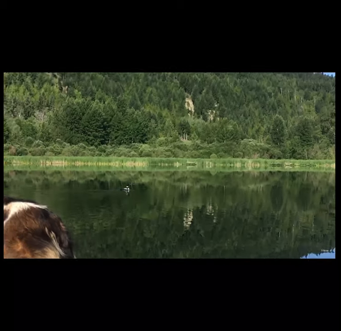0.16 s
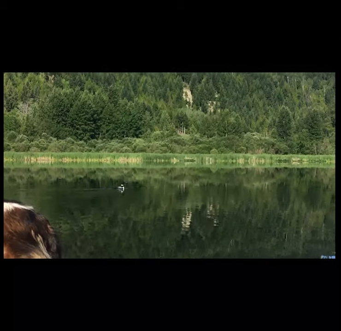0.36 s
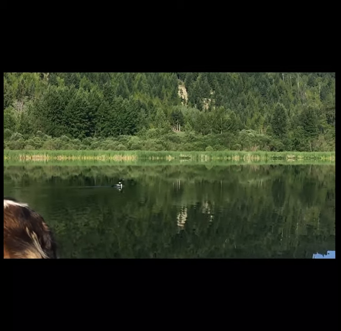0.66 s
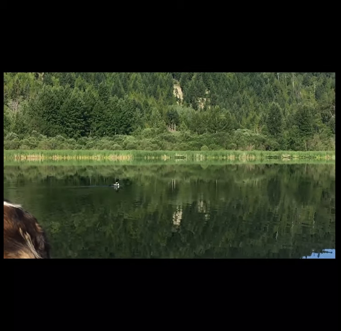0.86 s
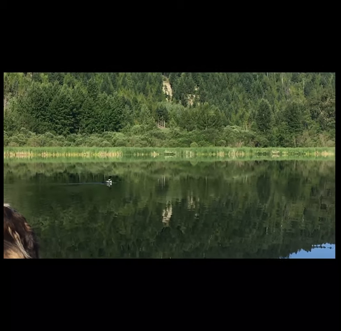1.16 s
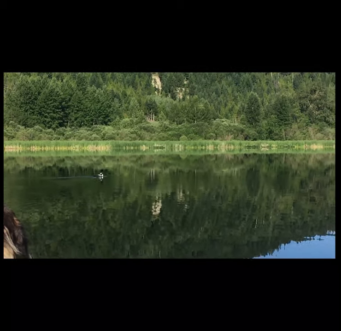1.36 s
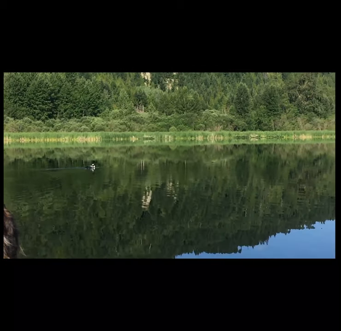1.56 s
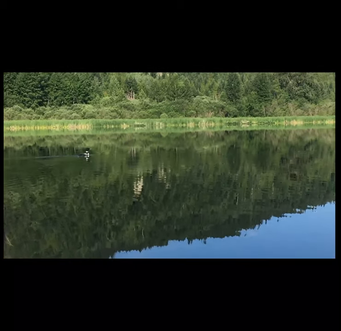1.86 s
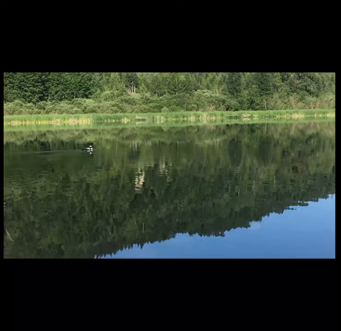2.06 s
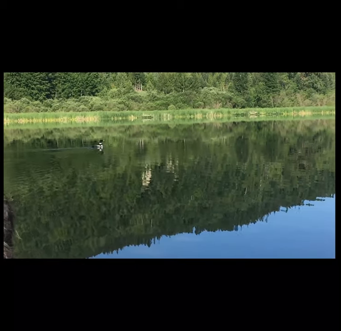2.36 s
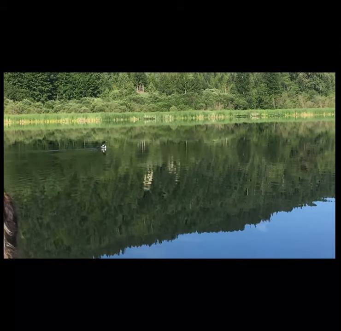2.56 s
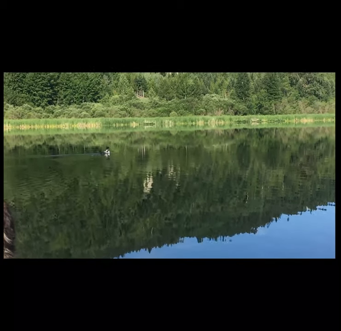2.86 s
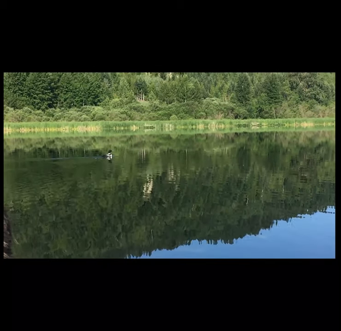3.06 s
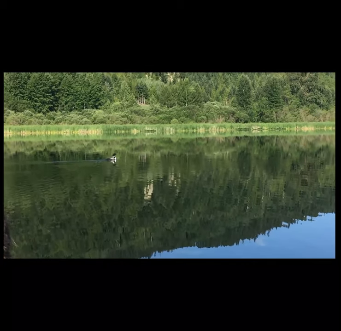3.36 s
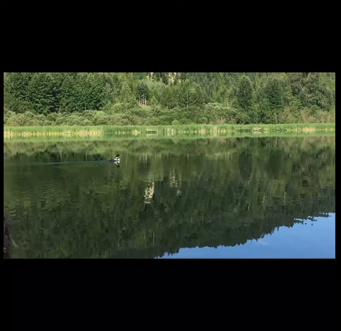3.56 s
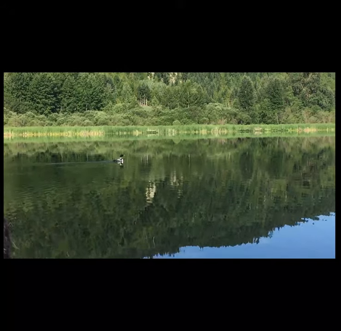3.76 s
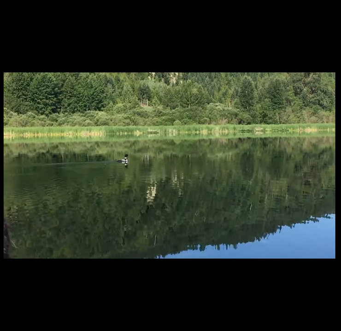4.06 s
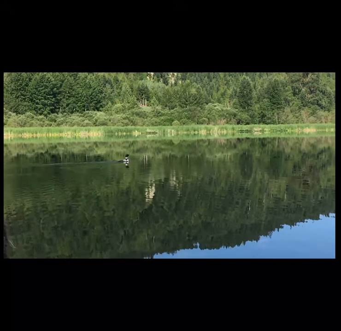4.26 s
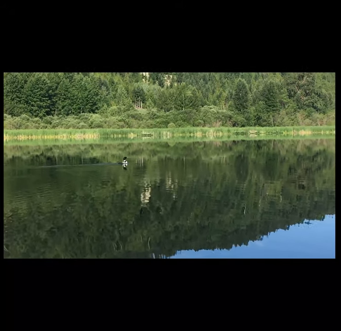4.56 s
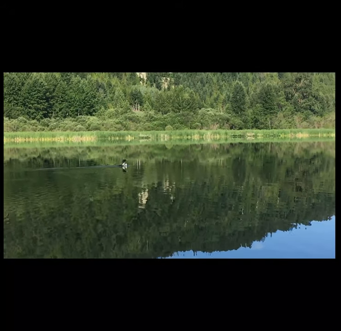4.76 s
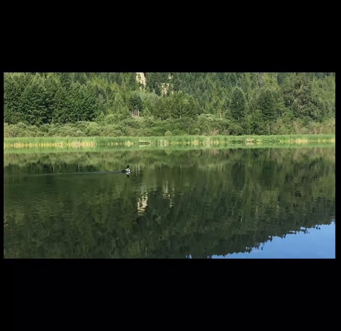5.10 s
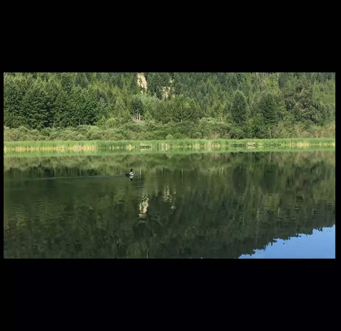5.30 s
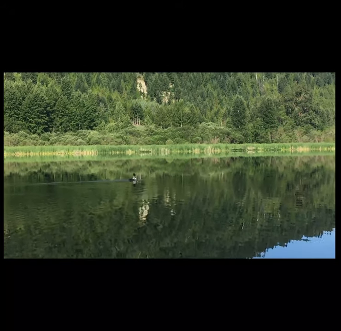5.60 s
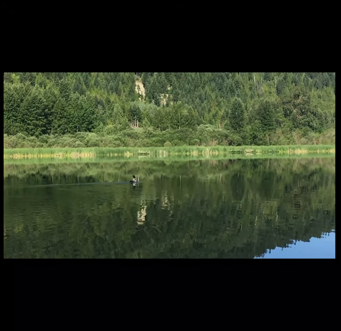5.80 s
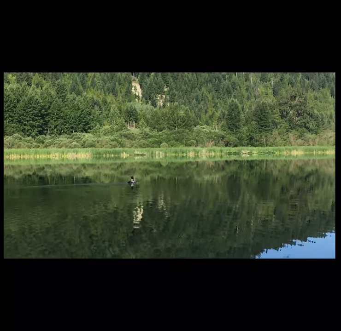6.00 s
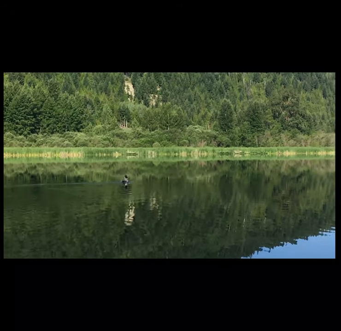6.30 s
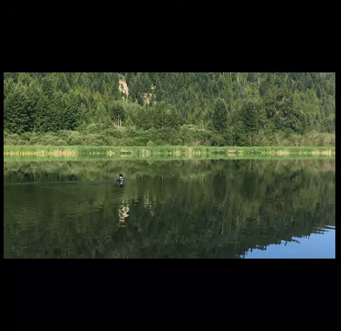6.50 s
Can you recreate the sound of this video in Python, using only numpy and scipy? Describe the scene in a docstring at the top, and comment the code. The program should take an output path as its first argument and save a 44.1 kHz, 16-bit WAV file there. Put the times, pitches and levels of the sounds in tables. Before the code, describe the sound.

On a calm forested lake, a fairly near loon gives quick wavering tremolo calls, each rising from a low voice into a clear high one, about every two seconds. Two farther loons answer faintly in between. The first half second has rough rubbing, snaps and soft knocks right at the microphone; then quiet air, occasional ticks and thin songbird chirps, with a soft hillside echo.

```python
"""A calm, wooded lake under still air: three loons trade tremolo calls, one near and two further out.
Each full call wavers about ten times a second as effort builds and tires: low, then a purer high register,
then at times low again, ending in a sigh. Harmonics pass through throat colours; a faint wash returns from the hillside.
Shaped noise rustles by the microphone at first, with damped knocks, dry snaps, faint ticks and scratches;
distant songbirds are thin gliding sines, and the air is coloured noise."""
import sys
import numpy as np
from scipy import signal
from scipy.fft import rfft, irfft
from scipy.io import wavfile
from scipy.ndimage import map_coordinates

SR = 44100
rng = np.random.default_rng(int(sys.argv[2]) if len(sys.argv) > 2 else 0)


def log_audio(samples):
    """Write samples as a 16-bit WAV file to the path given in sys.argv[1]."""
    # one column per channel
    frames = np.atleast_2d(samples).T
    # limit to full scale, then quantise
    limited = np.clip(frames, -1, 1)
    pcm = np.round(limited * 32767).astype(np.int16)
    wavfile.write(sys.argv[1], SR, pcm)


N = 292824
TIME = np.arange(N) / SR


def undb(db):
    """Decibels to gain."""
    return 10 ** (np.asarray(db) / 20)


def gain_at(hz, points):
    """Gain of a (hz, db) spectrum, read on a log-frequency axis."""
    at, db = np.transpose(points)
    return undb(np.interp(np.log(hz + 1), np.log(at), db))


def noise(points, size=N):
    """Noise of rms 1 with the given colour, rolled off below its first point."""
    hz = np.arange(size // 2 + 1) * SR / size
    below = np.minimum(hz / points[0][0], 1) ** 2
    white = rng.standard_normal(size)
    x = irfft(rfft(white) * gain_at(hz, points) * below, size)
    return x / x.std()


def walk(rate, size=N):
    """Smooth random curve of spread near 1, with rate new values a second."""
    place = np.arange(size) * rate / SR
    return map_coordinates(rng.standard_normal(size // 8 + 4), [place], order=3, mode="mirror")


def add(out, s, x):
    """Mix x into out from time s on."""
    i = max(int(s * SR), 0)
    out[i:i + len(x)] += x[:max(N - i, 0)]


# colour of the still air over the lake: pitch_hz, relative level_db
AIR_COLOUR = [(25, -14), (38, -8), (58, 2), (85, -1), (125, -10.5), (165, -2), (195, -8), (240, -4.5),
              (330, -18.5), (600, -22), (900, -21.5), (1150, -17.5), (1400, -26), (2200, -23.5),
              (2900, -31.5), (4400, -27.5), (5000, -34.5), (9500, -40), (10500, -44), (12000, -40.5),
              (15500, -47.5)]
AIR_DB = -59


def air(sway_db, low_db, low_sway_db, drift_db=0.5):
    """An outdoor hush of noise: smooth in the treble, swaying and slowly drifting in the bass."""
    hush = noise(AIR_COLOUR) * undb(AIR_DB)
    low = signal.sosfiltfilt(signal.butter(2, 400, fs=SR, output="sos"), hush)
    treble = (hush - low) * undb(sway_db * walk(3.81))
    bass = low * undb(low_db + low_sway_db * walk(8.3) + drift_db * walk(2))
    return treble + bass


# notes of distant songbirds, before random detuning and loudness:
# start_s, note_length_s, start_hz, end_hz, relative level_db, notes in the run
BIRD_NOTES = [(3.232, 0.018, 4300, 2830, -64.5, 12), (3.608, 0.065, 4620, 4500, -74, 1),
              (4.78, 0.027, 3300, 3600, -76, 1), (4.851, 0.034, 3300, 3556, -77, 1),
              (4.915, .055, 4700, 3080, -71, 1), (5.07, .025, 3200, 3460, -74, 1),
              (5.134, 0.0241, 4730, 3690, -71.5, 1), (5.463, .055, 4750, 3070, -70.5, 1),
              (5.62, .03, 3200, 3530, -67, 1), (5.678, 0.023, 4900, 3700, -71, 1),
              (5.846, .024, 4400, 2950, -64, 5), (5.995, .03, 4800, 3050, -68, 5)]
TRILL_PERIOD_S = .0268


def songbirds(level_db, scatter_db, uneven_db=2.2, settle_db=8):
    """Distant thin whistles: gliding sines, single or run together as a trill, smeared by the trees."""
    out = np.zeros(N)
    for s, length, start_hz, end_hz, db, count in BIRD_NOTES:
        size = int(length * SR)
        left = np.linspace(1, 0, size)
        for k in range(int(round(count))):
            detune, loud, late = rng.standard_normal(3)
            # each sweep slows towards its end; in a trill the weight lies on its last part
            hz = (end_hz + (start_hz - end_hz) * left ** 1.8) * (1 + .04 * detune)
            whistle = np.sin(2 * np.pi * np.cumsum(hz) / SR)
            run_swell = np.sin(np.pi * (k + 1) / (count + 1)) ** .5
            level = undb(db + uneven_db * loud - settle_db * left * (count > 1))
            note = run_swell * level * signal.windows.tukey(size, .4) * whistle
            add(out, s + k * TRILL_PERIOD_S + 0.0018 * late, note)
    trees = rng.standard_normal(SR // 2) * undb(-60 * TIME[:SR // 2] / 0.29)
    trees /= np.sqrt(np.sum(trees ** 2))
    smear = undb(scatter_db) * signal.fftconvolve(out, trees)[:N]
    return undb(level_db) * (out + smear)


# thin high scratches: start_s, level_db before the swell and grain
SCRATCHES = [(6.075, -72.5), (6.47, -83)]


def scratches(length_s=.05, grain_db=5):
    """Brief grainy rubs high in the treble: noise with a fast random level."""
    out, size = np.zeros(N), int(length_s * SR)
    for s, db in SCRATCHES:
        hiss = noise([(6000, -14), (10000, -8), (12000, -2), (16000, -17)], size)
        grains = hiss * undb(grain_db * walk(250, size))
        add(out, s, undb(db) * np.hanning(size) * grains)
    return out


# dry snaps within the rustle: start_s, relative level_db
SNAP_LEVELS = [(.009, -31), (.203, -28), (.468, -28)]
# faint sharp ticks: start_s, relative level_db
TICK_LEVELS = [(1.5634, -47), (2.5667, -44.5), (3.3773, -47), (4.5746, -44), (5.5778, -47.5),
               (6.5815, -43.5)]
# colour of a tick: pitch_hz, relative level_db
TICK_SPECTRUM = [(3000, -24), (4400, 5), (5500, -6), (7300, -3.5), (8500, -17.5), (10000, -15.5),
                 (13000, -45)]


def clicks(table, colour, t60_s):
    """Very short bursts of coloured noise, decaying 60 dB in t60_s."""
    out, t = np.zeros(N), TIME[:SR // 10]
    for s, db in table:
        add(out, s, undb(db - 60 * t / t60_s) * noise(colour, len(t)) / 2)
    return out


# soft knocks close by: start_s, level_db before the onset, pitch_hz, ring_t60_s
KNOCK_MODES = [(.016, -33.5, 522, 0.051), (0.142, -29, 48.7, 0.12), (.203, -29, 186, 0.038),
               (0.53, -41, 430, 0.058), (.559, -22, 60.8, 0.066), (0.557, -27, 266, 0.024),
               (0.709, -39, 255, 0.024), (0.932, -41, 466, .035), (0.932, -35, 240, 0.023),
               (1.099, -47.5, 330, .04), (1.176, -42.5, 130.3, 0.062), (1.178, -45, 525, 0.051),
               (1.682, -43, 510, 0.06), (2.179, -48.5, 478, 0.095), (2.265, -49, 327, .1),
               (2.291, -46.5, 497, 0.082)]


def knocks(contact_s=0.00074, dull_db=-11):
    """Each soft blow rings one damped low mode with a little dull noise."""
    out, t = np.zeros(N), TIME[:SR // 4]
    for s, db, hz, t60 in KNOCK_MODES:
        thud = noise([(80, 20.5), (500, -9.5), (900, -37), (3000, -40.5), (8000, -43)], len(t))
        ring = np.sin(2 * np.pi * hz * t) + undb(dull_db) * thud
        onset = 1 - np.exp(-t / contact_s)
        add(out, s, undb(db - 60 * t / t60) * onset * ring)
    return out


# rubs by the microphone: start_s, length_s, relative rubbing level_db, relative hiss level_db
RUBS = [(0, .045, -53, -75), (.045, .075, -48.5, -72.5), (.12, .07, -58, -83), (.188, .062, -42, -73),
        (.25, .075, -45, -67.5), (.33, .075, -51, -79), (.41, .085, -49.5, -67), (.51, .055, -51, -73)]
# colours of the rubbing, the hiss and the handling rumble: pitch_hz, relative level_db
RUB_SPECTRUM = [(120, 0.5), (220, -0.5), (500, -3.5), (800, -11.5), (1300, -9.5), (2100, -9), (2750, -24),
                (3300, -16.5), (4300, -14.5), (6000, -47), (11000, -51.5)]
HISS_SPECTRUM = [(1000, -23.5), (2800, -13), (4300, 4), (5600, 3.5), (7500, -6.5), (9500, -7),
                 (10400, -21.5), (12500, -19), (16000, -31.5)]
RUMBLE_SPECTRUM = [(18, -15.5), (35, 10), (60, 22.5), (120, 10.5), (200, -20), (350, -53)]
RUB_ATTACK_S, RUB_RELEASE_S = .02, .012
RUMBLE_END_S, RUMBLE_RELEASE_S = .59, .014


def rustle(rub_db, hiss_db, rumble_db, grain_db):
    """Uneven rubbing noise close to the microphone, with a handling rumble under it."""
    rub, hiss = np.zeros(N), np.zeros(N)
    for s, length, stroke_db, stroke_hiss_db in RUBS:
        attack = np.clip((TIME - s) / RUB_ATTACK_S, 0, 1)
        stroke = attack * np.exp(-np.maximum(TIME - s - length, 0) / RUB_RELEASE_S)
        rub = np.hypot(rub, undb(stroke_db) * stroke)
        hiss = np.hypot(hiss, undb(stroke_hiss_db) * stroke)
    rumble = np.exp(-np.maximum(TIME - RUMBLE_END_S, 0) / RUMBLE_RELEASE_S)
    grain = undb(grain_db * walk(260) + 3.3 * walk(45))  # fine catches within coarser slips
    scrape = undb(rub_db) * rub * noise(RUB_SPECTRUM)
    scrape += undb(hiss_db) * hiss * noise(HISS_SPECTRUM)
    return grain * scrape + undb(rumble_db) * rumble * noise(RUMBLE_SPECTRUM)


def hillside(x, wash_db, t60_s, build_s):
    """Countless faint returns from the forested shore, building up and dulled by distance."""
    t = TIME[:3 * SR]
    returns = noise([(300, -15.5), (700, -1.5), (1150, -0.5), (1600, -6.5), (3000, -15.5), (8000, -29)], len(t))
    returns *= (1 - np.exp(-t / build_s)) * undb(-60 * t / t60_s)
    returns /= np.sqrt(np.sum(returns ** 2))
    return undb(wash_db) * signal.fftconvolve(x, returns)[:N]


# effort builds at the start of a call and fades at its end; each share is the effort missing there
WARM_UP_S, COLD_SHARE = .129, .327
TIRING_S, TIRED_SHARE = .361, .341
TIRING_MOST = .65  # a short call tires over this share of its length
TIRED_SLOWING = 2.26  # wavers per s lost by the end
# loudness swells just ahead of each crest; a shape under 1 gives round swells, sharp dips
PUSH_LEAD_S, PUSH_SHAPE = .0025, .55
# round the break up the pitch strains and the voice thins
BREAK_S, BREAK_RISE, BREAK_DIP_DB, BREAK_DULL_DB = .009, .055, 7, 9
WAVER_SWING, CREST_SHAPE = .212, .88  # share of pitch gained at a full-effort crest; under 1 = round crests
LOW_PITCH_SHARE = .729  # the low register against the high one
LOW_PITCH_SAG, HIGH_PITCH_SAG = .441, .277  # share of pitch lost with all effort gone
LOW_EFFORT_DB, HIGH_EFFORT_DB = 17, 25  # level lost with all effort gone
TROUGH_DULL_DB, COLD_DULL_DB = 11, 10  # loss of the upper overtones in a trough and at the start
YELP_BRIGHT_DB = 13  # a tired voice in the low register turns bright
SIGH_SINK, SIGH_FADE_DB = .06, 18  # share of pitch and level lost over the closing sigh


def tremolo(t, high, start, up, end, sigh_s, crest_s, rate, pitch_hz, dip_db):
    """Pitch, level and brightness of a call, all led by its effort and its waver; also the count of wavers."""
    held = np.minimum(t, end)
    tiring_s = min(TIRING_S, TIRING_MOST * (end - start))
    cold = np.exp(-(held - start) / WARM_UP_S)
    tired = np.maximum(1 - (end - held) / tiring_s, 0) ** 2
    slack = COLD_SHARE * cold + TIRED_SHARE * tired
    strain = np.exp(-np.abs(t - up) / BREAK_S)
    sigh = (t - held) / sigh_s

    wavers = rate * (held - crest_s) - TIRED_SLOWING * tiring_s * tired / 2
    crest = np.abs(np.cos(np.pi * wavers)) ** (2 * CREST_SHAPE)
    push = np.abs(np.cos(np.pi * (wavers + rate * PUSH_LEAD_S))) ** (2 * PUSH_SHAPE)

    if high:
        share, sag, effort_db = 1, HIGH_PITCH_SAG, HIGH_EFFORT_DB
    else:
        share, sag, effort_db = LOW_PITCH_SHARE, LOW_PITCH_SAG, LOW_EFFORT_DB
    swing = WAVER_SWING * crest * (1 - slack)
    hz = pitch_hz * share * (1 + swing - sag * slack + BREAK_RISE * strain - SIGH_SINK * sigh)
    level_db = -effort_db * slack - dip_db * (1 - push) - SIGH_FADE_DB * sigh
    level_db -= BREAK_DIP_DB * strain * (not high)
    bright_db = -TROUGH_DULL_DB * (1 - crest) - COLD_DULL_DB * cold - BREAK_DULL_DB * strain
    bright_db += YELP_BRIGHT_DB * tired * crest * (not high)
    return hz, level_db, bright_db, wavers


# colour of the throat in the low and the high register: pitch_hz, relative level_db
LOW_REGISTER = [(600, 3.5), (720, 0), (830, -5.5), (1300, -1.5), (1600, 3), (1950, -20), (2200, -12),
                (2550, -42), (2900, -50.5), (3300, -15.5), (3650, -33), (4100, -21.5), (4800, -37.5),
                (5200, -36), (6000, -44.5), (7500, -66.5)]
HIGH_REGISTER = [(900, 1), (1300, 1.5), (1850, -35), (2150, -14.5), (2350, -17), (2850, -56), (3200, -43),
                 (3500, -26), (3800, -44), (4300, -25), (4750, -49), (5300, -43), (6500, -76.5)]
SHIMMER_DB = .22  # small random level changes


def loon_note(t, high, pitch_hz, level_db, bright_db, wavers, overtone_db, rasp_db, jitter=.0045,
              flutter_db=4.5, low_fundamental_db=-2.2, rasp_s=0.0023, attack_s=0.01, release_s=.005,
              edge_s=.003):
    """One stretch in one register: a clean harmonic tone that rasps where the voice breaks."""
    hz = pitch_hz * (1 + jitter * walk(500, len(t)))
    phase = 2 * np.pi * np.cumsum(hz) / SR
    k = np.arange(1, 10)[:, None]  # harmonic numbers
    # overtones swell as they sweep through the throat's resonances; the upper ones come and go
    upper_db = bright_db + flutter_db * np.array([walk(59.4, len(t)) for _ in k])
    colour_db = overtone_db * (k > (1 if high else 2)) + upper_db * (k > (2 if high else 3))
    # the fundamental is held back against its octave in the low register
    colour_db = colour_db + low_fundamental_db * (k == 1) * (not high)
    partials = gain_at(k * hz, HIGH_REGISTER if high else LOW_REGISTER) * undb(colour_db)
    partials /= np.sqrt(np.sum(partials ** 2, axis=0) / 2)
    tone = np.sum(partials * np.sin(k * phase), axis=0)

    # the vibration is unsteady on the jump up and just after the bottom of each low swoop
    troughs = t[1:][np.diff(np.round(wavers)) > 0]
    breaks = t[:1] if high else troughs + .002
    unsteady = np.exp(-((t - breaks[:, None]) / rasp_s) ** 2 / 2).sum(axis=0)
    rasp = noise([(450, -22), (800, 3), (1100, 12), (1600, 1), (2300, -10.5), (2800, -33.5),
                  (4200, -25.5), (7000, -51)], len(t))
    rasp_gain = undb(rasp_db - 2.4 * high) * unsteady + undb(-33)  # a little breath throughout
    voice = tone * (1 - 0.72 * unsteady * (not high)) + rasp * rasp_gain

    fade_in = (t - t[0]) / (edge_s if high else attack_s)
    edges = np.clip(np.minimum(fade_in, (t[-1] - t) / release_s), 0, 1)
    return voice * edges * undb(level_db + SHIMMER_DB * walk(220, len(t)))


# calls of a higher-voiced distant bird, a bird further out and the near bird: start_s, break_up_s,
# drop_back_s, end_s, sigh_length_s, crest_s (time of one crest), wavers per s before tiring,
# pitch_hz (high register, before waver and effort), level_db (high register, at full effort),
# overtones_db (on top of the throat colour)
HIGHER_LOON_CALLS = [ (1.41, 1.538, 1.69, 1.69, .005, 1.538, 11.3, 1110, -36, -20),
                     (1.7, 1.729, 1.79, 1.79, .005, 1.735, 10.5, 1145, -34, -20),
                     (1.8, 1.851, 1.875, 1.875, .005, 1.847, 9.5, 1150, -36, -20),
                     (3.9, 4.093, 4.335, 4.46, .02, 4.094, 10.64, 1055, -37, -20)]
FAR_LOON_CALLS = [ (-.25, -.1, .445, .445, .02, .085, 10.5, 981, -34, -21),
                  (1.357, 1.495, 2.035, 2.035, .02, 1.579, 10.28, 970, -38, -21),
                  (3.487, 3.515, 3.515, 3.515, .006, 3.49, 10.5, 940, -40.5, -21),
                  (3.556, 3.688, 4.045, 4.045, .02, 3.691, 10.7, 982, -36.6, -21),
                  (5.624, 5.757, 6.212, 6.212, .008, 5.842, 10.55, 980, -37.1, -21),
                  (6.216, 6.272, 6.272, 6.272, .008, 6.255, 4, 835, -47, -21)]
NEAR_LOON_CALLS = [ (.262, .467, .726, .815, .05, .4545, 10.6, 989, -20.9, -3),
                   (1.964, 2.179, 2.532, 2.532, .03, 2.177, 10.6, 989, -21.4, -0.5),
                   (4.03, 4.251, 4.602, 4.602, .027, 4.254, 10.66, 997, -21, -2),
                   (6.521, 6.73, 7.08, 7.08, .03, 6.724, 10.8, 992, -21.4, -2)]


def loon(calls, low_db, low_dip_db, high_dip_db, rasp_db, overlap_s=.0015):
    """A bird's calls, low, high and low again, skipping empty stretches; the level dips in each waver's trough."""
    out = np.zeros(N)
    for start, up, down, end, sigh_s, crest_s, rate, pitch_hz, db, overtone_db in calls:
        stretches = (start, up, False), (up, down, True), (down, end + sigh_s, False)
        for begin, stop, high in stretches:
            t = TIME[(TIME > begin - overlap_s) & (TIME < stop + overlap_s)]
            if stop > begin and len(t) > 1:
                dip_db = high_dip_db if high else low_dip_db
                shape = tremolo(t, high, start, up, end, sigh_s, crest_s, rate, pitch_hz, dip_db)
                note = loon_note(t, high, *shape, overtone_db, rasp_db)
                add(out, t[0], undb(db if high else db + low_db) * note)
    return out


def scene():
    """The air and songbirds, the small sounds close by, and the loons with their echo."""
    background = air(sway_db=0.5, low_db=-1.1, low_sway_db=1.6)
    background += songbirds(level_db=1.5, scatter_db=-0.5)

    close = scratches() + clicks(TICK_LEVELS, TICK_SPECTRUM, t60_s=0.01)
    snap_colour = [(400, 0), (1500, 20), (2200, 10), (2800, -11), (4500, -5), (9000, -27.5), (12000, -54)]
    close += clicks(SNAP_LEVELS, snap_colour, t60_s=0.045)
    close += knocks() + rustle(rub_db=1.5, hiss_db=9.0, rumble_db=-46, grain_db=2.0)

    loons = loon(HIGHER_LOON_CALLS, low_db=-8.3, low_dip_db=11, high_dip_db=17, rasp_db=-4.5)
    loons += loon(FAR_LOON_CALLS, low_db=-3.6, low_dip_db=18, high_dip_db=12, rasp_db=-6.5)
    loons += loon(NEAR_LOON_CALLS, low_db=-1.3, low_dip_db=14.5, high_dip_db=8, rasp_db=-5)
    # the nearest bank answers at once, the forested slope lingers
    bank = hillside(loons, wash_db=-36.5, t60_s=0.075, build_s=0.0088)
    slope = hillside(loons, wash_db=-48.5, t60_s=9.7, build_s=0.1)
    return (background + close + loons + bank + slope)[None]


def record(dry):
    """The recorder cuts the deepest rumble and the top."""
    lean = signal.sosfilt(signal.butter(4, 33, "highpass", fs=SR, output="sos"), dry)
    return signal.sosfilt(signal.ellip(10, .2, 70, 15700, fs=SR, output="sos"), lean)


dry = scene()
out = record(dry)
log_audio(out)
```